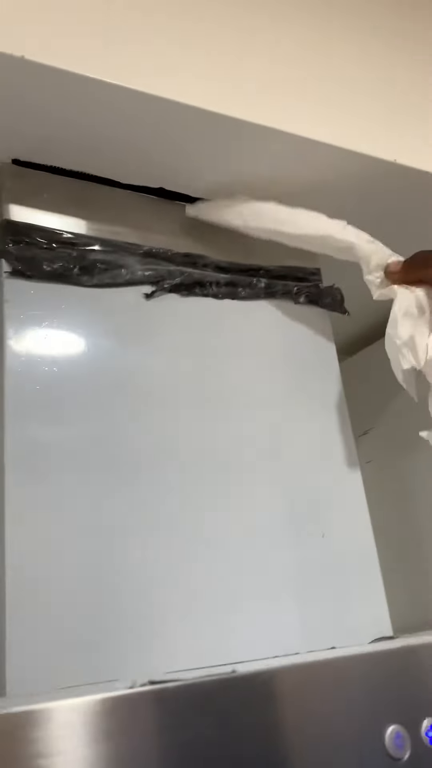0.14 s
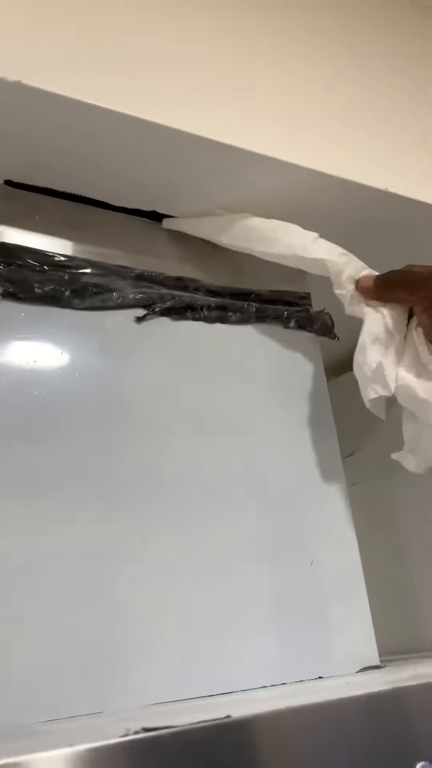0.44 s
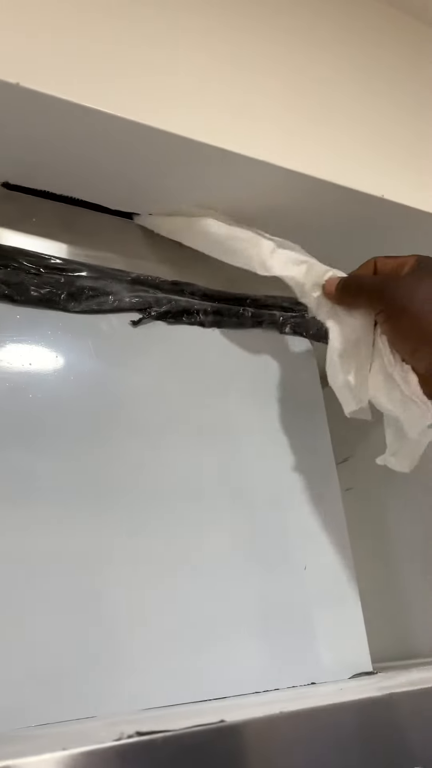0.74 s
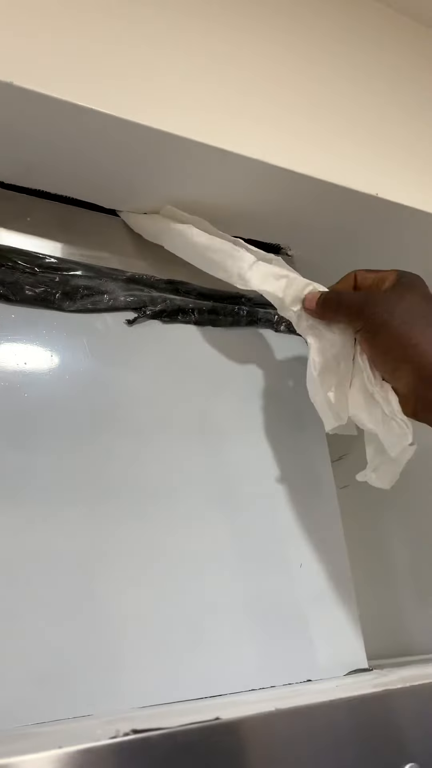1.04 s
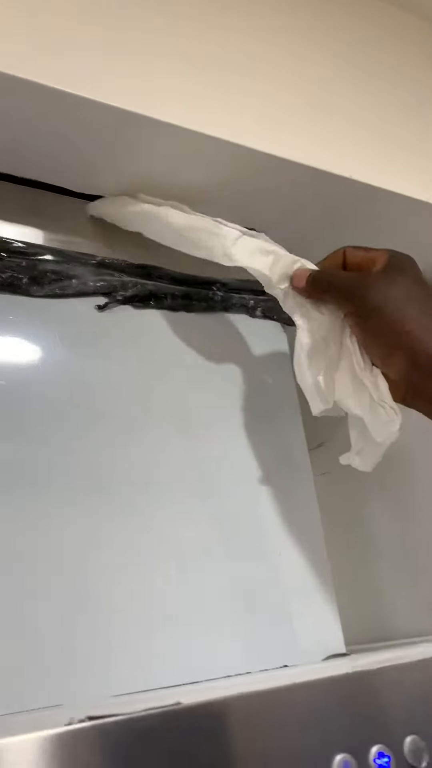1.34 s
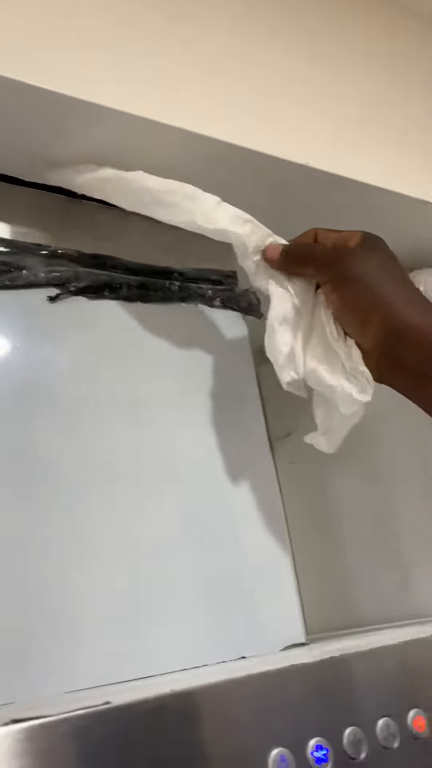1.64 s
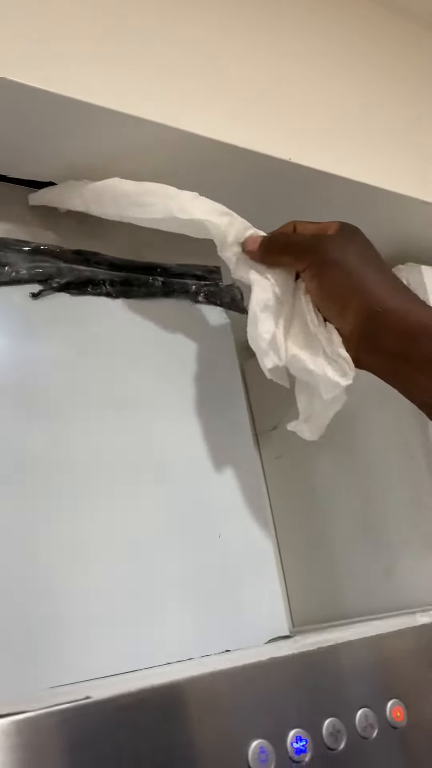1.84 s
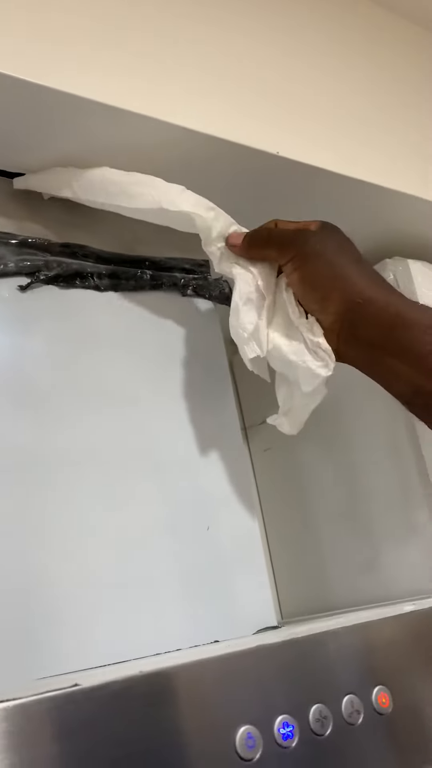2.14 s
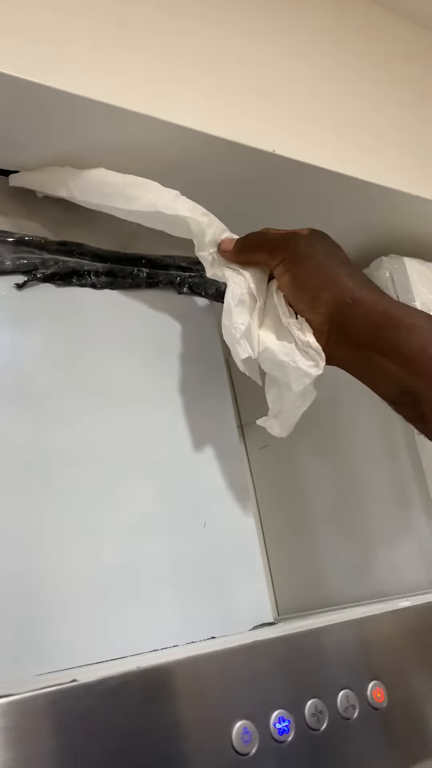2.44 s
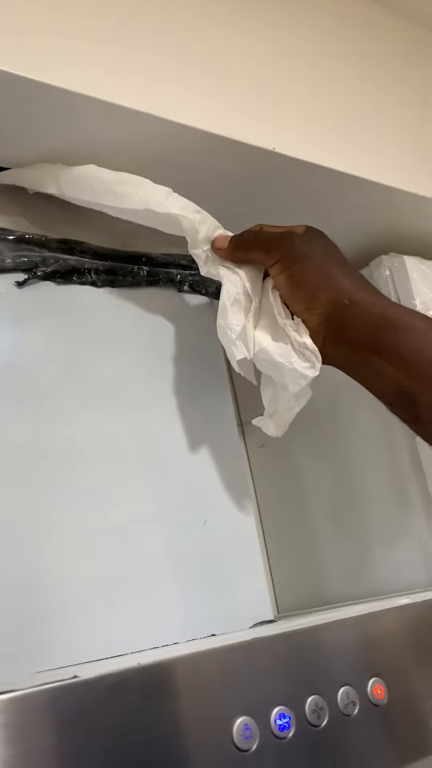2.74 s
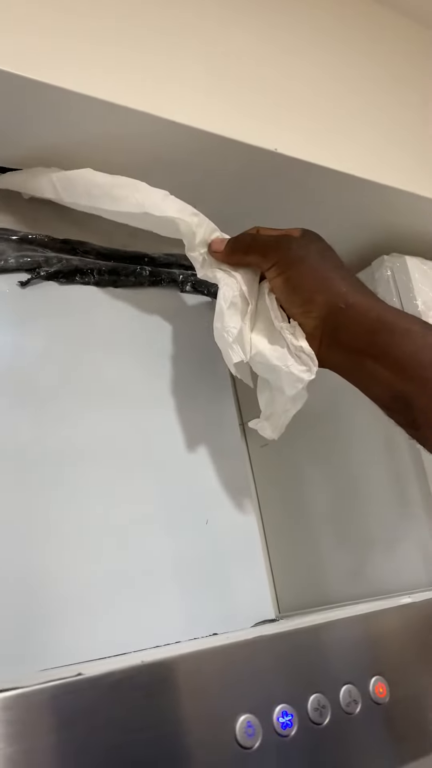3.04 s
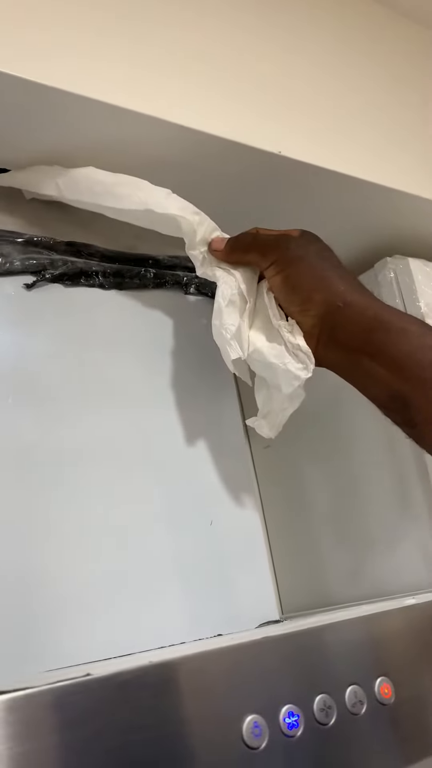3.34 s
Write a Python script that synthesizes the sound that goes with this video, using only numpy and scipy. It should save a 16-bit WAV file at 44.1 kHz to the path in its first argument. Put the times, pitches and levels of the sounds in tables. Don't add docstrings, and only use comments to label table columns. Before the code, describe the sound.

Constant range hood blower noise, humming and whooshing, with a fine hiss of air from a loose joint. Early on, paper ticks, then rubs softly; afterwards mostly the fan alone, heard close in a kitchen.

```python
import sys
import numpy as np
from scipy import signal
from scipy.fft import rfft, irfft, next_fast_len
from scipy.io import wavfile
from scipy.ndimage import uniform_filter1d, map_coordinates

SR = 44100
rng = np.random.default_rng(int(sys.argv[2]) if len(sys.argv) > 2 else 0)


def to_wav(sig):
    pcm = np.clip(np.atleast_2d(sig), -1, 1) * 32767
    pcm = np.round(pcm).astype(np.int16)
    wavfile.write(sys.argv[1], SR, pcm.T)


def boost_factor(decibels):
    exponent = np.asarray(decibels, float) / 20
    return 10 ** exponent


N = 154350

# [start_s, level_db]
LOAD = [
    (0, -35.5),
    (1.1, -36),
    (1.9, -35.5),
    (3.0, -35.5),
    (3.5, -36),
]
RUMBLE_DB, RUSH_DB, LEAK_DB = -1, -4, -16
# [frequency_hz, density_db]
RUMBLE_SPECTRUM = [(20, -39), (36, -22.5), (60, -4), (88, -11.5), (135, -9.5), (180, -4.5), (250, -2),
                   (295, -13.5), (480, -16.5)]
RUSH_SPECTRUM = [(330, -55), (470, -8), (560, -0.5), (900, -7), (1500, -10), (2100, -17), (2900, -25.5),
                 (4200, -50)]
LEAK_SPECTRUM = [(1800, -0.5), (2800, 0.5), (4200, 0), (6600, -5), (7700, -16.5), (8800, -9), (11000, -23),
                 (15700, -31)]
# [centre_hz, width_hz, gain_db]
HOOD_MODES = [(70, 18, 3.5), (183, 25, 2), (240, 30, -6), (334, 22, 6), (465, 20, -6), (521, 18, 6.5),
              (580, 44, 4.5), (663, 18, 5.5), (862, 60, 3), (1103, 25, 3.5), (1413, 55, 3.5),
              (1524, 50, 3.5), (2013, 90, 3), (2490, 40, 3)]
GLINT_DB = 2

# [pitch_hz, level_db, wobble_db]
HUM = [(119.9, -37, .5), (239.85, -39.5, .6)]
# [start_s, level_db]
STANDING_WAVE = [
    (0, -1.5),
    (1.2, 0),
    (1.8, 0.4),
    (3, -1),
    (3.4, 1.8),
]
# [pitch_hz, level_db, wobble_db]
WHINE = [(2610, -70.5, 3), (2727.5, -70.5, 2.5), (3058, -79, 3), (3437, -79, 3), (6222, -84, 3)]
HUM_SIDE_DB = -23.5

# [frequency_hz, density_db]
PAPER_SPECTRUM = [(2500, -8), (4500, 2), (7000, 4), (10000, 4.5), (11000, -4), (13000, -4), (15700, -13)]
GRAINS_PER_S, GRAIN_SPREAD_DB, GRAIN_SHARE = 4000, 2, .2
CREASE_DB = 3.5
BRIGHT_HZ = 9000
# [start_s, pressure_db, brightness_db]
CONTACT = [
    (0, -60, 1),
    (.09, -68, 2),
    (.145, -59, 10),
    (.166, -47, 6),
    (.2, -55.5, 8),
    (.26, -72, 3),
           (.34, -66, 0),
    (.44, -58, 1),
    (.54, -55, 5),
    (.59, -54.5, -4),
    (.65, -52, 0),
    (.69, -50, 3),
    (.72, -51, 5),
    (.77, -57, 5),
    (.86, -77, 0),
           (3.25, -80, -11),
    (3.4, -67, -6),
    (3.5, -74, -6),
]
# [start_s, peak_db]
TICKS = [
    (.116, -48),
    (0.132, -50),
    (0.141, -46),
    (.147, -43),
]
TICK_T60_S = 0.007

# [frequency_hz, likeness_0_to_1]
ALIKE_BASS = [(40, .9998), (100, .997)]
ALIKE = ALIKE_BASS + [(260, 0.98), (550, 0.83), (1200, 0.75), (1800, 0.83), (2600, 0.12), (3700, 0.32),
         (4600, 0.92)]
# [frequency_hz, lead_rad]
LEAD = [(0, 0), (800, -.2), (1550, 0), (2700, 1.3), (4750, np.pi), (6950, 2 * np.pi), (9050, 3 * np.pi),
        (15300, 6 * np.pi)]
# [frequency_hz, level_db]
PAN = [(35, 2), (70, -.5), (250, -0.6), (600, -1.5), (2000, -1.1), (4000, 0)]
# [frequency_hz, share_0_to_1]
STRICT_LOSS = [(3500, 0), (4400, .17), (5000, .17), (6500, .38), (9000, .32), (13200, .38), (15000, .42)]
# [frequency_hz, share_0_to_1]
LENIENT_LOSS = [(3500, 0), (4750, -.1), (6500, .38), (8500, .08), (9000, .3), (13200, .38), (15000, .42)]
# [start_s, lean]
LEAN = [
    (0, -1.6),
    (.7, -1.6),
    (.79, 1.2),
    (.86, -1.8),
    (1.3, -1.4),
    (1.5, -.3),
    (3.2, -.2),
    (3.5, .3),
]
DITHER_PER_S = 26
# [low_hz, high_hz]
DITHER_BANDS = [(0, 4600), (4600, 4850), (4850, 7000), (7000, 16000)]
LOSS_EDGE, TOP_HZ = .16, 15740


def unit(x):
    return x / np.sqrt(np.mean(x ** 2) + 1e-20)


def along(points, hz, outside=None):
    f, v = np.transpose(points)
    return np.interp(np.log(hz + 1), np.log(f + 1), v, outside, outside)


def curve(rows, column=1):
    table = np.transpose(rows)
    return np.interp(np.arange(N) / SR, table[0], table[column])


def wobble(rate):
    knots = rng.standard_normal(int(N * rate / SR) + 4)
    return map_coordinates(knots, [np.arange(N) * rate / SR])


def filtered(x, response):
    m = next_fast_len(N + SR // 2)
    return irfft(rfft(x, m) * response(np.fft.rfftfreq(m, 1 / SR)), m)[..., :N]


def ports(pair, gain):
    def split(hz):
        angle = np.arccos(np.clip(along(ALIKE, hz), -1, 1)) / 2
        return gain(hz) * [np.cos(angle), np.sin(angle)]
    mid, side = filtered(pair, split)
    return unit(np.array([mid + side, mid - side]))


def patches(x, depth_db, size, bins, frames):
    z = signal.stft(x, nperseg=size)[2]
    field = uniform_filter1d(rng.standard_normal(z.shape[1:]), size=bins, axis=0)
    field = uniform_filter1d(field, size=frames, axis=1)
    return signal.istft(z * boost_factor(depth_db * unit(field)), nperseg=size)[1][:, :x.shape[1]]


def air(spectrum, patchy_db, glint):
    wide = patches(rng.standard_normal((2, N)), patchy_db, size=512, bins=6, frames=12)
    pair = patches(wide, glint * GLINT_DB, size=2048, bins=2, frames=8)

    def colour(hz):
        ring_db = sum(db / (1 + (2 * (hz - c) / width) ** 2) for c, width, db in HOOD_MODES)
        return boost_factor(along(spectrum, hz, outside=-120) + ring_db)
    return ports(pair, colour)


def blower():
    rumble = boost_factor(RUMBLE_DB + 1.1 * wobble(5.92)) * air(RUMBLE_SPECTRUM, patchy_db=-0.43, glint=0.045)
    rush = boost_factor(RUSH_DB + 0.33 * wobble(4.1)) * air(RUSH_SPECTRUM, patchy_db=0.81, glint=0.55)
    leak = boost_factor(LEAK_DB + 0.17 * wobble(8.1)) * air(LEAK_SPECTRUM, patchy_db=1.44, glint=1.45)
    return boost_factor(curve(LOAD)) * (rumble + rush + leak)


def tones(lines, drift_hz, rate):
    t, out = np.arange(N) / SR, 0
    for hz, db, sway_db in lines:
        drift_cycles = np.cumsum(drift_hz * wobble(rate)) / SR
        phase = 2 * np.pi * (hz * t + drift_cycles + rng.random())
        level = np.sqrt(2) * boost_factor(db + sway_db * wobble(rate))
        side = boost_factor(HUM_SIDE_DB) * np.cos(phase) * [[1], [-1]]
        out = out + level * (np.sin(phase) + side)
    return out


def motor():
    hum = boost_factor(curve(STANDING_WAVE)) * tones(HUM, drift_hz=.05, rate=3)
    return hum + tones(WHINE, drift_hz=2, rate=5)


def paper_colour(hz):
    return boost_factor(along(PAPER_SPECTRUM, hz, outside=-120))


def paper_brush():
    sizes = boost_factor(GRAIN_SPREAD_DB * rng.exponential(size=N)) * rng.choice([-1, 1], N)
    grains = unit(sizes * (rng.random(N) < GRAINS_PER_S / SR))
    smooth = rng.standard_normal((2, N))
    rub = np.sqrt(GRAIN_SHARE) * grains + np.sqrt(1 - GRAIN_SHARE) * smooth
    rub = patches(rub, CREASE_DB, size=512, bins=10, frames=5)
    contact = CONTACT
    brush = ports(rub, paper_colour) * boost_factor(curve(contact) + 0.87 * wobble(44.7))
    upper = filtered(brush, lambda hz: np.clip(np.log2(hz / BRIGHT_HZ + 1e-9), 0, 1))
    return brush + (boost_factor(curve(contact, column=2)) - 1) * upper


def paper_ticks():
    start_s, peak_db = np.transpose(TICKS)[:, :, None]
    since = np.arange(N) / SR - start_s
    decay = boost_factor(peak_db - 60 * np.abs(since) / TICK_T60_S) * (since >= 0)
    return decay.sum(axis=0) * ports(rng.standard_normal((2, N)), paper_colour)


def scene():
    return blower() + motor() + paper_brush() + paper_ticks()


def between_ports(dry):
    lead_hz, lead_rad = np.transpose(LEAD)
    half = np.array([[.5], [-.5]])

    def response(hz):
        return np.exp(1j * half * np.interp(hz, lead_hz, lead_rad)) * boost_factor(half * along(PAN, hz))
    return filtered(dry, response)


def kept(loss):
    lead_hz, lead_rad = np.transpose(LEAD)

    def response(hz):
        angle = np.interp(hz, lead_hz, lead_rad) / 2
        side_share = np.where(hz > lead_hz[4], np.sin(angle), 1)
        share = np.abs([np.cos(angle), side_share])
        return np.clip((share - along(loss, hz)) / LOSS_EDGE, 0, 1) * (hz < TOP_HZ)
    return response


def top_cut(x):
    return signal.sosfilt(signal.butter(12, 16750, fs=SR, output="sos"), x)


def record(dry):
    left, right = between_ports(dry)
    pair = np.array([left + right, left - right]) / 2
    picture = filtered(pair, kept(STRICT_LOSS))
    spared = filtered(pair, kept(LENIENT_LOSS)) - picture
    for low, high in DITHER_BANDS:
        lenient = np.clip(2 * (curve(LEAN) + wobble(DITHER_PER_S)), 0, 1)
        picture = picture + lenient * filtered(spared, lambda hz: (hz >= low) & (hz < high))
    mid, side = picture
    return top_cut(np.array([mid + side, mid - side]))


dry = scene()
out = record(dry)
to_wav(out)
```